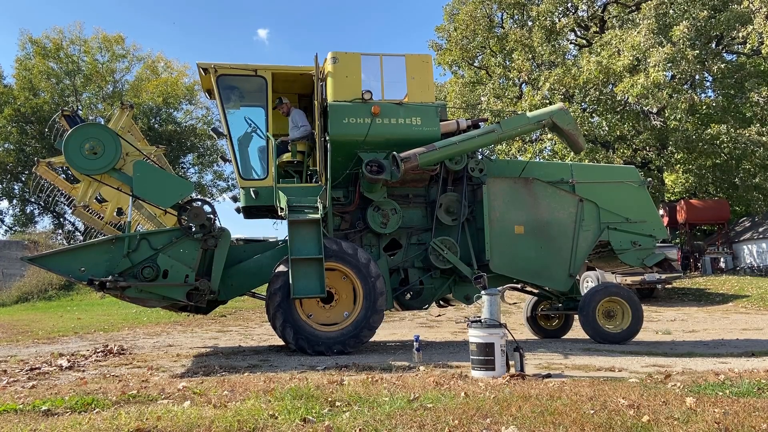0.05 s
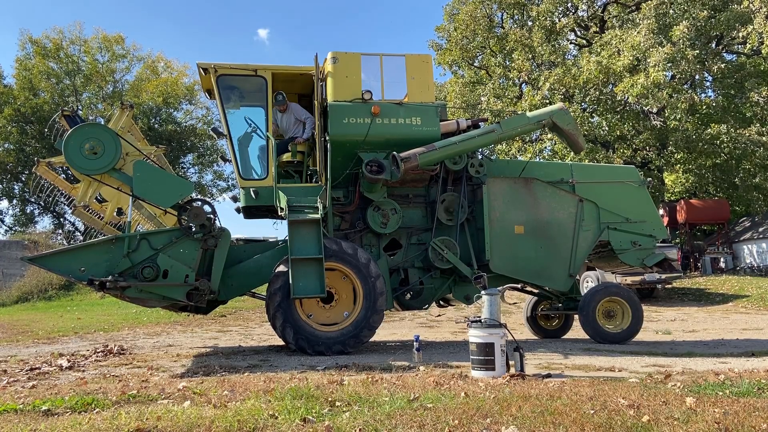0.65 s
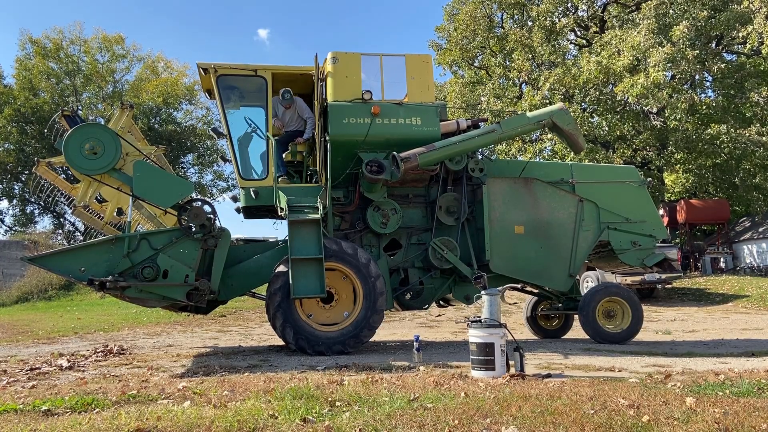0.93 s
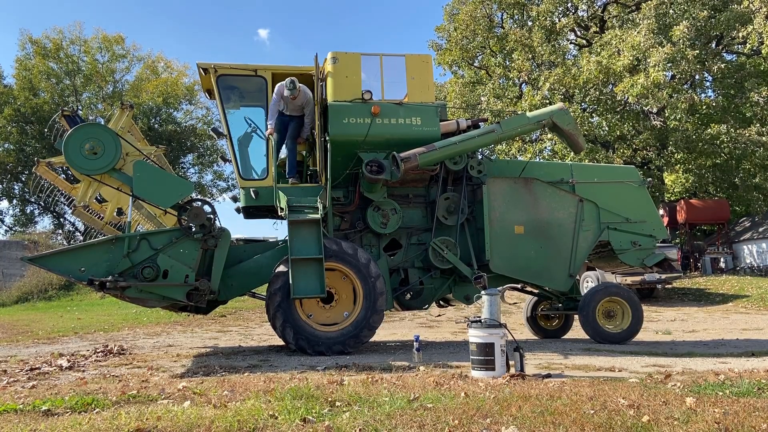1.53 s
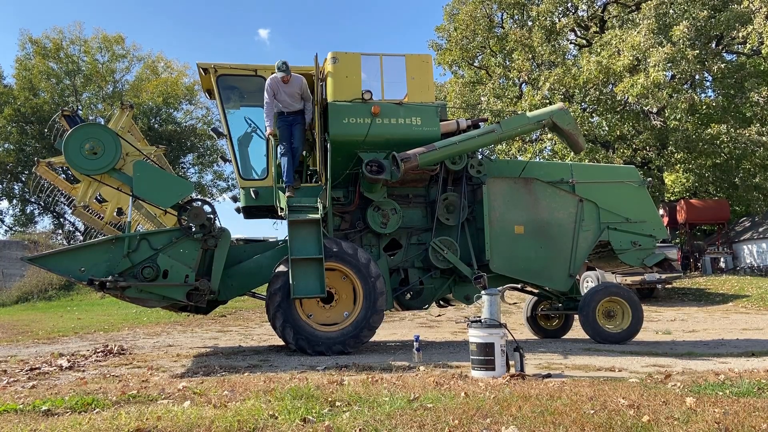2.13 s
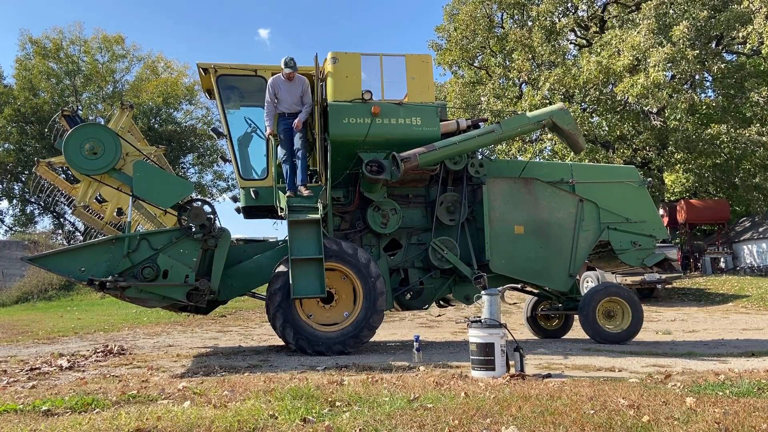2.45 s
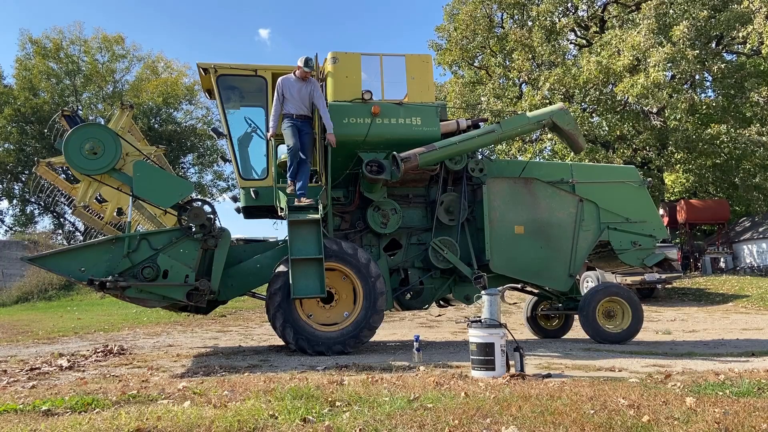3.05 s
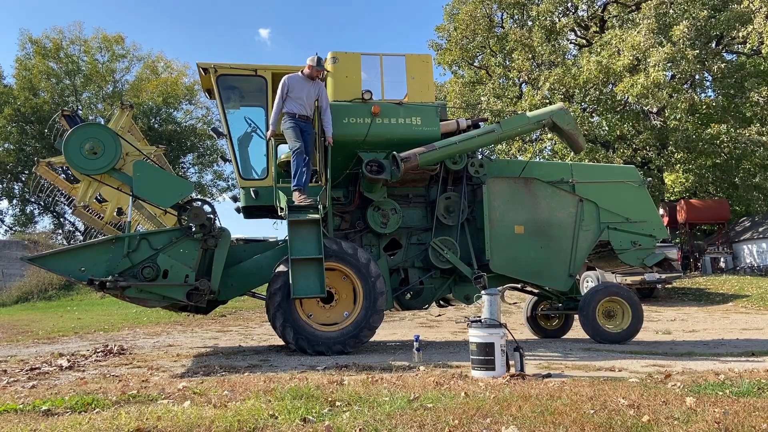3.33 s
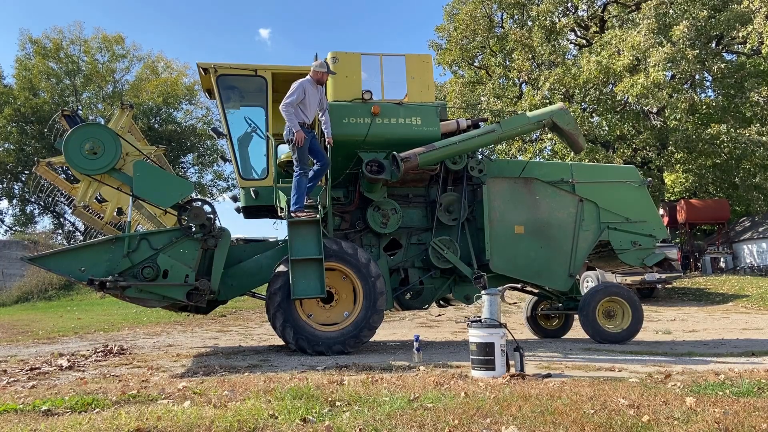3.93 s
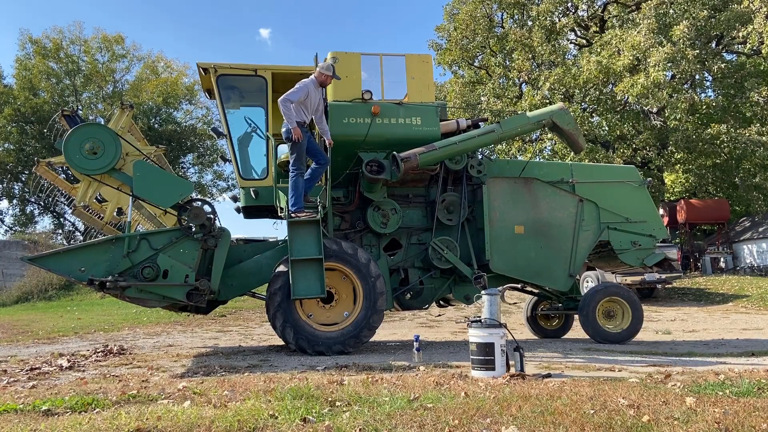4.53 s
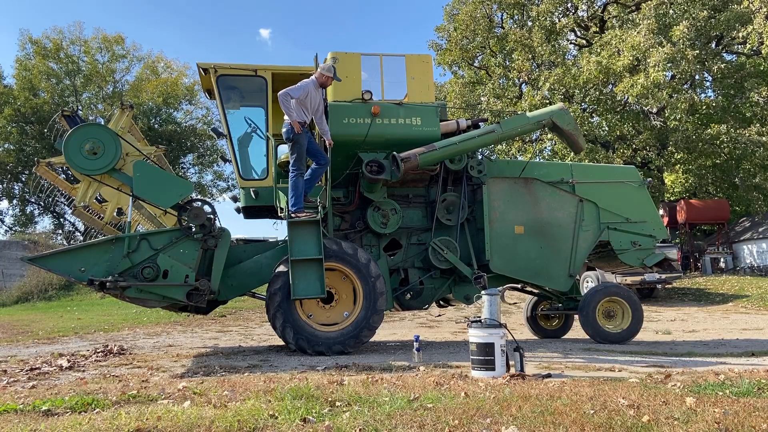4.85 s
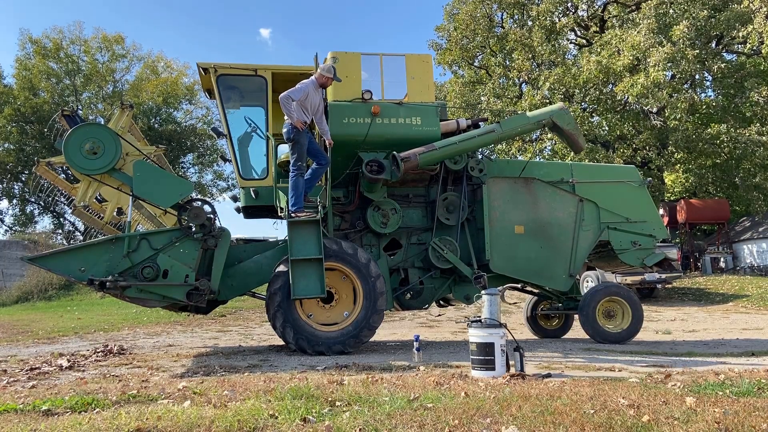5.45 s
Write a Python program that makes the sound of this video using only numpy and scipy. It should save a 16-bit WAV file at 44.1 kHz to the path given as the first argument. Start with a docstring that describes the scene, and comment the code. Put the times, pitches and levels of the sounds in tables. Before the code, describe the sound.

A large, cold combine engine is running from the first moment, its deep, throbbing exhaust by far the loudest sound. It rises modestly in speed and pitch over about four seconds, then holds steady until the end, near five and a half seconds. Misfires make it stumble often in the first two seconds, less often afterwards. For the first second and a half, loose steel jingles and a rod rings thinly. At about 2.2 seconds a boot lands on the steel platform with a hollow thud and a short scuff. Throughout, quieter machinery sounds behind the exhaust: sharp valve ticks, hollow piston clanks, intake hiss, a hoarse gear whine and a faint belt squeak four or five times a second. Light panel knocks come around 1.4, 2.3, 3.2, 3.7 and 5 seconds. The microphone is a phone beside the machine in an open farmyard.

```python
"""A stumbling boom and a jingle of loose steel: an old combine's cold six-cylinder engine, just started,
runs up to speed in an open farmyard. Firings from the two halves of the manifold ring the muffler, and
now and then a cylinder misses. Behind the boom, tappets tick, pistons slap, gears whine, loose parts ring,
a belt squeaks once a lap and a boot lands on the steel platform.
The microphone is a phone, off to the side of the machine."""
import sys
import numpy as np
from scipy import signal
from scipy.fft import rfft, irfft, next_fast_len
from scipy.io import wavfile
from scipy.ndimage import uniform_filter1d

SR = 44100
rng = np.random.default_rng(int(sys.argv[2]) if len(sys.argv) > 2 else 0)


def pcm_store(signal):
    """Save signal as 16-bit PCM."""
    levels = np.round(np.clip(np.atleast_2d(signal), -1, 1) * 32767)
    wavfile.write(sys.argv[1], SR, levels.astype(np.int16).T)


N = 250929
TIME = np.arange(N) / SR
SIZE = next_fast_len(N + SR // 2)
FREQ = np.arange(SIZE // 2 + 1) * SR / SIZE


def undb(db):
    """Decibels to gain."""
    return 10 ** (np.asarray(db) / 20)


def level(x, db):
    """Scale to an rms level."""
    return x * undb(db) / np.sqrt(np.mean(x ** 2))


def gains(points):
    """Gain at every frequency from points of f/Hz, level/dB."""
    hz, db = np.transpose(points)
    return undb(np.interp(np.log(FREQ + 1), np.log(hz), db))


def shape(x, response):
    """Filter by a frequency response."""
    spectrum = rfft(x.astype(np.float32), SIZE) * response.astype(np.complex64)
    return irfft(spectrum, SIZE)[..., :N].astype(float)


def colour(x, points):
    """Causal filter with the given spectrum: it rings after a blow, never before."""
    cepstrum = irfft(np.log(gains(points)), SIZE)
    cepstrum[1:SIZE // 2] *= 2
    cepstrum[SIZE // 2 + 1:] = 0
    return shape(x, np.exp(rfft(cepstrum)))


def ring(x, modes):
    """Resonances side by side: f/Hz, width/Hz, level/dB."""
    s = 1j * FREQ
    return shape(x, sum(undb(db) * s * width / (s * s + s * width + hz * hz) for hz, width, db in modes))


def noise():
    """Two white noises: the direct sound and the scattered sound."""
    return rng.standard_normal((2, N))


def walk(rate_hz):
    """Smooth random drift with a spread near 1."""
    hold = int(SR / rate_hz)
    return uniform_filter1d(np.repeat(rng.standard_normal(N // hold + 1), hold), hold)[:N]


def impulses(times, sizes):
    """One impulse at each time that falls within the scene."""
    at = np.floor(np.asarray(times) * SR).astype(int)
    return np.bincount(np.where(at < 0, N, at), sizes, N + 1)[:N]


def fade(blows, t60):
    """Envelope that jumps at each blow and falls 60 dB in t60 seconds."""
    return signal.lfilter([1], [1, -np.exp(-np.log(1000) / (t60 * SR))], blows + 1e-18)


def swell(phase, peak, depth_db):
    """A level that rises and falls once a cycle."""
    return undb(depth_db * np.cos(2 * np.pi * (phase - peak)))


def engine_speed(cold_hz=52.458, settled_hz=61.269, run_up_s=2.636, steepness=1.809):
    """Firings per second: the cold engine gathers pace along an S-curve, then settles."""
    return settled_hz - (settled_hz - cold_hz) * np.exp(-(TIME / run_up_s) ** steepness)


def speed_gain(hz, db_per_octave):
    """Gain that grows with engine speed, 1 at the mean speed."""
    return undb(db_per_octave * np.log2(hz / hz.mean()))


# the six cylinders in firing order: firing level/dB, lateness/s, tappet level/dB
CYLINDERS = [(-0.5, .00025, 16.5), (0.15, .00015, 26), (0.2, .00035, 13), (-2.26, -.00015, 22.5),
             (-0.65, -.0001, 13.5), (-0.7, -.00045, 22)]
def cylinders(times):
    """Strength, lateness and tappet level of the cylinder whose turn it is at each firing."""
    return np.array(CYLINDERS)[np.arange(len(times)) % len(CYLINDERS)].T


# misses, rarer as the engine warms: t/s
MISFIRES = [.093, .302, .416, .529, .755, .867, 1.09, 1.22, 1.638, 1.942, 2.277, 3.001, 3.625, 4.208, 4.801,
            5.096, 5.194, 5.49]
def charges(times, miss_share=0.2):
    """Pressure of each firing: full, or a small share where the cylinder misses."""
    misses = [np.argmin(abs(times - when)) for when in MISFIRES]
    return np.where(np.isin(np.arange(len(times)), misses), miss_share, 1)


# air drawn through the carburettor: f/Hz, level/dB
INTAKE = [(1500, 8), (3000, -19), (3900, -1), (4400, -6.5), (5000, 2), (5600, -1), (6400, -3.5), (8000, -2),
          (11000, -0.5), (16000, -29)]
def intake(crank):
    """Each cylinder gulps air with a short hiss."""
    gulps = swell(crank, peak=0.46, depth_db=1.5) * undb(1.8 * walk(50))
    return level(colour(noise() * gulps, INTAKE), -43.0)


def gears(crank, teeth_per_firing=16, width_hz=28.4):
    """Worn gears give a hoarse whine that climbs with the engine's speed."""
    grind = shape(noise(), 1 / (1 + 1j * FREQ / width_hz) ** 2)
    mesh = teeth_per_firing * crank + 0.44 * walk(60)
    return level(grind * np.sin(2 * np.pi * mesh), -44.0)


# the pulley, rung by the rubbing belt: f/Hz, width/Hz, level/dB
PULLEY = [(970, 68, -12), (1277, 30, -8), (1434, 27, -17.5)]
def belt(crank, hz, squeak_hz=1286.0, waver_hz=16.0, lap_firings=13.22, rub_laps=0.11):
    """A stiff spot in the belt sticks and slips on the pulley once a lap: a squeak inside a scrape."""
    lap = (crank - 10.5) / lap_firings
    from_spot = (lap + .5) % 1 - .5
    rub = np.exp(-.5 * (from_spot / rub_laps) ** 2) * speed_gain(hz, 12)
    pitch = squeak_hz + waver_hz * walk(90)
    squeak = np.sin(2 * np.pi * np.cumsum(pitch) / SR) * undb(0.9 * walk(110))
    scrape = ring(noise() * rub * swell(crank, peak=.35, depth_db=2.5), PULLEY)
    return level(rub * squeak, -46.3) + level(scrape, -44.5)


# taps on a loose rod while the engine is slow: t/s, level/dB
ROD_TAPS = [(.022, -40), (.105, -43), (.195, -38), (.368, -42), (.61, -49), (.648, -40), (.812, -37),
            (.985, -40), (1.042, -34), (1.25, -49), (1.432, -38)]
def rod(ring_hz=2194.0, t60=0.17):
    """Each tap leaves a thin ring in the rod."""
    when, db = np.transpose(ROD_TAPS)
    width = np.log(1000) / (np.pi * t60)
    taps = impulses(when, undb(db)) * SR / (2 * np.pi * width)
    return ring(taps, [(ring_hz, width, 0)])


# modes of a loose guard: f/Hz, wander/Hz, level/dB
GUARD = [(4414, 100, 3), (4580, 140, 3.5), (5610, 230, 5)]
# its hard clashes: t/s, level/dB relative to a tap at resonance
CLASHES = [(0.022, -1), (.064, 3), (.368, 3.5), (0.539, 0), (.577, 1), (.632, 2.5), (.82, 5), (.968, 1),
           (1.046, -1), (1.188, 3), (1.283, 6.5)]
def guard(times, hz, resonance_hz=53.2, width_hz=2.3, resonance_db=5.5, lag_s=.0076, t60=.047):
    """Firings shake a guard into clusters of jingles, most at its resonance; a miss lets it rest."""
    detuning = (np.interp(times, TIME, hz) - resonance_hz) / width_hz
    cluster_db = 2.5 * np.tanh(np.interp(times, TIME, walk(16)))
    jingle_db = resonance_db * np.exp(-detuning ** 2) + cluster_db
    shaken = np.minimum(charges(times), np.roll(charges(times), -1))
    when, clash_db = np.transpose(CLASHES)
    clashes = impulses(when, undb(resonance_db + clash_db))
    out = 0
    for ring_hz, wander_hz, db in GUARD:
        force, play = rng.uniform(-1, 1, (len(times), 2)).T
        taps = impulses(times + lag_s + .003 * play, shaken * undb(jingle_db + 3 * force))
        hits = undb(db) * np.maximum(fade(taps, t60), fade(clashes, t60))
        pitch = ring_hz + wander_hz * np.array([walk(50) + 1.6 * walk(1200) for _ in range(2)])
        out = out + uniform_filter1d(hits, size=130) * np.sin(2 * np.pi * np.cumsum(pitch, axis=1) / SR)
    return level(out, -47.5)


# spectrum of a valve tick: f/Hz, level/dB
TAPPET = [(1500, -47), (4000, 6), (7000, 2.5), (8700, 4), (10200, 10), (11400, 9.5), (12600, 5.5),
          (14000, 6), (16000, 0)]
# hard snaps of a loose tappet: t/s, relative level/dB
SNAPS = [(0.023, -23), (0.0623, -23), (0.175, -22), (0.4788, -30), (0.631, -23), (0.9676, -18),
         (1.4097, -26), (1.7355, -19), (2.3351, -45), (2.5775, -23), (2.7836, -22), (3.056, -34),
         (3.0896, -16.5), (3.1577, -24), (3.2435, -25), (3.294, -24), (3.4461, -24), (3.495, -25),
         (3.9963, -24), (4.0627, -31), (4.0941, -27), (4.2931, -23), (4.3445, -27), (4.4912, -24),
         (5.2804, -24), (5.3767, -27), (5.444, -20), (5.5767, -24)]
def valves(times, lag_s=.0033, play_s=.0008, bounce_s=.0022, bounce_db=-3, t60=.016):
    """A tappet ticks and bounces after every firing, as loud as it is loose; some snap hard."""
    force, play, bounce_play, bounce_force = rng.standard_normal((len(times), 4)).T
    _, _, tappet_db = cylinders(times)
    size = undb(tappet_db + 2.4 * np.minimum(force, 1))
    seat = times + lag_s + play_s * play
    bounces = impulses(seat + bounce_s + play_s * bounce_play, size * undb(bounce_db + 2 * bounce_force))
    steady = level(fade(impulses(seat, size) + bounces, t60), -47.6)
    when, db = np.transpose(SNAPS)
    snap_size = undb(db - 7.5)
    snaps = impulses(when, snap_size) + impulses(when + bounce_s, snap_size * undb(bounce_db))
    # each tick has a slightly soft onset, a hard snap softer still
    soft_snaps = uniform_filter1d(fade(snaps, t60), size=280)
    ticks = uniform_filter1d(np.hypot(steady, soft_snaps), size=70)
    return level(colour(noise(), TAPPET), 0) * ticks


# modes of the engine block: f/Hz, width/Hz, level/dB
BLOCK = [(930, 124, 7), (1910, 900, -24)]
def piston_slap(times, lag_s=.004, play_s=.001, scatter_db=1.3, t60=.092):
    """A cold piston slaps the block at each firing: a short, hollow clank."""
    force, play = rng.standard_normal((len(times), 2)).T
    blows = impulses(times + lag_s + play_s * play, charges(times) * undb(scatter_db * force))
    return level(ring(noise() * fade(blows, t60), BLOCK), -42)


# knocks on the ladder and loose panels: t/s, relative level/dB, f/Hz, rattle t60/s
KNOCKS = [(0.198, -34, 930, .05), (1.393, -35, 1140, 0.056), (1.732, -40, 1870, 0.28),
          (2.333, -36, 910, 0.07), (3.09, -39.5, 1110, .5), (3.177, -34.5, 1080, 0.049),
          (3.679, -36, 1150, 0.029), (3.682, -41, 4500, .078), (3.695, -35, 1070, .04),
          (4.983, -33, 993, 0.047)]
def knocks(strike_db=8, rattle_db=5.0, width_share=.09):
    """A firm blow on steel sheet rings a narrow resonance, and the sheet rattles on briefly."""
    out = 0
    for when, db, hz, t60 in KNOCKS:
        blow, width = impulses([when], [undb(db)]), width_share * hz
        strike = blow * undb(strike_db) * SR / (2 * np.pi * width)
        rattle = noise() * fade(blow, t60) * undb(rattle_db) * np.sqrt(SR / (np.pi * width))
        out = out + ring(strike + rattle, [(hz, width, 0)])
    return out


# modes of the steel platform: f/Hz, width/Hz, level/dB
PLATFORM = [(308, 10.4, 2.5), (390, 44, -20), (510, 37, -27)]
# scuffs as the sole lands and shifts: t/s, level/dB
SCUFFS = [(2.151, -25.5), (2.176, -28.5), (2.215, -29), (2.232, -31), (2.284, -32)]
def boot(land_s=2.166, scuff_hz=437.0, scuff_width_hz=250.0, t60=.055):
    """A boot lands on the platform with a hollow, ringing thud, and its sole scuffs the steel."""
    thud_width = PLATFORM[0][1]
    step = impulses([land_s], [undb(-20.5)]) * SR / (2 * np.pi * thud_width)
    when, db = np.transpose(SCUFFS)
    grit = shape(ring(noise(), [(scuff_hz, scuff_width_hz, 0)]), 1 / (1 + (FREQ / 1700) ** 4))
    return ring(step, PLATFORM) + level(grit, 0) * fade(impulses(when, undb(db)), t60)


# low exhaust rumble and, above it, the machinery's churn: f/Hz, level/dB
RUMBLE_AND_CHURN = [(30, 3.5), (150, 18.5), (200, 3), (260, 2), (330, -2), (420, -4), (650, -11),
                    (950, -13), (1400, -15), (1750, -16.5), (2300, -15.5), (2700, -22), (3450, -16),
                    (3900, -27), (8000, -37.5), (16000, -33.5)]
# modes of the body panels: f/Hz, width/Hz, level/dB
PANELS = [(515, 6.7, 13.5), (921, 54, 5), (1147, 34, 17.5), (1370, 46, 10), (1558, 28, 6), (1911, 26, 11),
          (2125, 89, 6.5)]
def rumble_and_churn(crank, hz, flutter_db=1.0, rumble_hz=248.0):
    """Low exhaust rumble grows with speed under the machinery's churn; each firing jolts the panels."""
    effort = speed_gain(hz, 9.0)
    drive = swell(crank, peak=0.42, depth_db=0.1) * effort * undb(flutter_db * walk(25))
    roar = level(colour(noise() * drive, RUMBLE_AND_CHURN), -24.0)
    rumble = shape(roar, 1 / (1 + (FREQ / rumble_hz) ** 4))
    churn = roar - rumble
    jolts = swell(crank, peak=0.18, depth_db=3.5) * undb(2.0 * walk(70))
    panels = level(ring(noise() * jolts, PANELS), -39.5)
    return churn + rumble * effort + panels


def burble(crank, hz, times, stack_hz=281.0, width_hz=254.0, blow_firings=.85):
    """One cylinder of the six blows harder: a short, uneven note slides up in the stack over gruff gas."""
    effort = speed_gain(hz, 15)
    cycle, place = np.divmod(crank - 4.3 + 3, 6)
    cycle, place = cycle.astype(int), place - 3  # place: firings from the blow's middle, 4.3 into a cycle
    force, tuning = rng.standard_normal((cycle[-1] + 1, 2))[cycle].T
    size = np.take(charges(times)[4::6], cycle, mode="clip") * undb(2 * force)
    overtone, slide = 4.15 + .2 * tuning, .5  # pitch in firing rates, and its rise per firing
    turns = (overtone + slide * place / 2) * place
    note = size * np.exp(-.5 * (place / blow_firings) ** 2) * np.sin(2 * np.pi * turns)
    stack = [(stack_hz, width_hz, 0)]
    puffs = noise()[0] * swell(crank / 6, peak=0.74, depth_db=1.0)
    gas = ring(ring(puffs, stack), stack)
    return level(note * effort, -37) + level(gas * effort, -44.0)


# the two halves of the manifold: f/Hz, width/Hz, level/dB
MANIFOLD = [(130.7, 33, 1.6), (123.8, 15, 8.9)]
# modes of muffler and stack: f/Hz, width/Hz, level/dB
MUFFLER = [(37, 28.8, 0), (71.3, 16.75, 9.5), (99.76, 18.1, -4)]
def exhaust(times, hz, push_db=2.5, scatter_db=.7, lead_s=.0066, jitter_s=.00018, high_pass_hz=1.5):
    """Uneven firings enter the manifold halves in turn and ring the muffler; a miss leaves a hole."""
    acceleration = np.gradient(hz)  # firings are stronger while the engine gathers pace
    throttle_db = np.interp(times, TIME, push_db * acceleration / acceleration.max())
    force, jitter = rng.uniform(-1, 1, (len(times), 2)).T
    strength_db, late_s, _ = cylinders(times)
    size = undb(throttle_db + strength_db + scatter_db * force) * charges(times)
    opening = times + late_s - lead_s + jitter_s * jitter
    gas = sum(ring(impulses(opening[k::2], size[k::2]), [half]) for k, half in enumerate(MANIFOLD))
    # neighbouring modes ring in opposite phase
    boom = sum((-1) ** k * ring(gas, [mode]) for k, mode in enumerate(MUFFLER))
    # an open stack radiates little of the slowest pressure swings
    return level(shape(boom, FREQ ** 2 / (FREQ ** 2 + high_pass_hz ** 2)), -12.05)


# share of scattered sound that differs between left and right at the phone: f/Hz, level/dB
SPREAD = [(100, -12), (500, -15), (1200, -13), (2500, -32), (4300, -8), (6200, -6), (8000, -9), (9000, -93),
          (10000, -21), (11200, -11), (12300, 1.5), (13300, -32), (14300, -26), (15200, -21)]
def scene():
    """From beside the combine: the exhaust is central, the clatter is scattered by the machine's body."""
    hz = engine_speed()
    crank = .127 + np.cumsum(hz) / SR  # counted in firings
    times = np.interp(np.arange(int(crank[-1]) + 1), crank, TIME)
    running = rumble_and_churn(crank, hz) + piston_slap(times) + gears(crank) + belt(crank, hz)
    running = running + intake(crank) + valves(times)
    direct, scattered = running + guard(times, hz) + rod() + knocks() + boot()
    side = shape(scattered, gains(SPREAD))
    return exhaust(times, hz) + burble(crank, hz, times) + direct + np.array([side, -side])


# balance of the phone's channels: f/Hz, left minus right level/dB
MIC_BALANCE = [(130, -.3), (300, -1.7), (1100, -1.4), (2000, .2), (3800, .6), (5000, -1.5), (6300, 1.8),
               (7500, 0)]
# phase between them: f/Hz, lead of the left/rad
MIC_PHASE = [(0, 0), (600, -.2), (2200, 0), (3700, 0), (5000, -.8), (6000, -1.6), (6600, 0), (8000, -1.7),
             (9000, -3.14), (11000, -6.2), (11500, -6.4), (13300, -9.42), (15200, -12.57)]
def record(dry, top_hz=15750):
    """The phone in the yard: its two channels differ in phase and level, and the top is cut."""
    lead = np.interp(FREQ, *np.transpose(MIC_PHASE))
    left = np.sqrt(gains(MIC_BALANCE)) * np.exp(.5j * lead)
    heard = shape(dry, np.array([left, 1 / left]))
    return signal.sosfilt(signal.ellip(10, .2, 80, top_hz, fs=SR, output="sos"), heard)


dry = scene()
out = record(dry)
pcm_store(out)
```